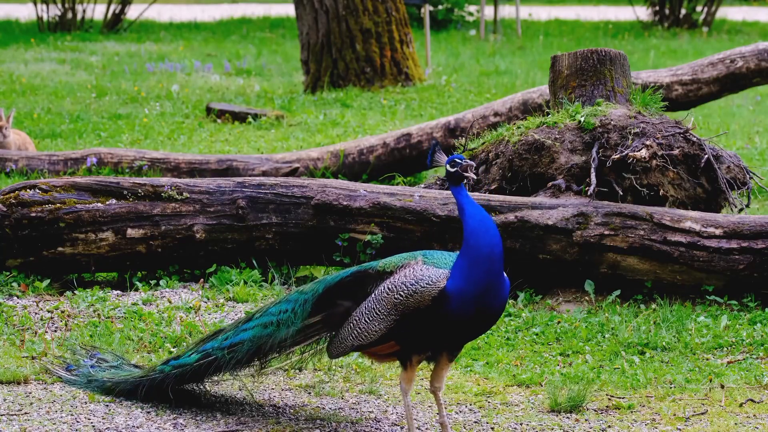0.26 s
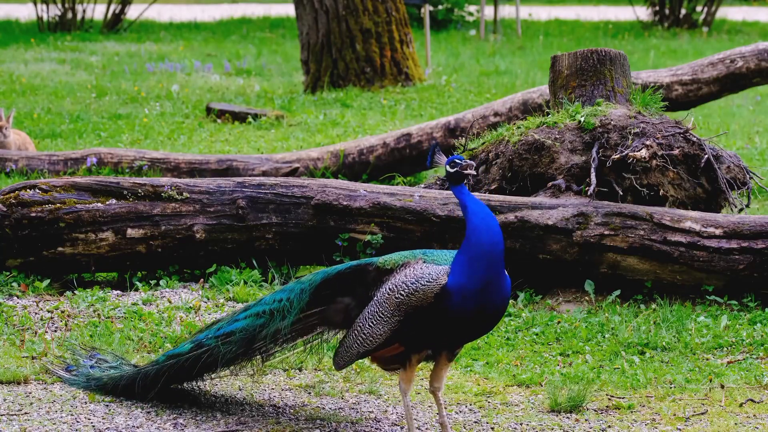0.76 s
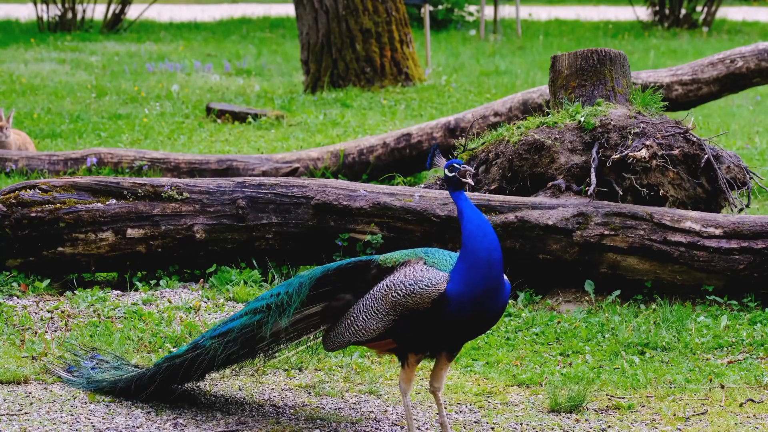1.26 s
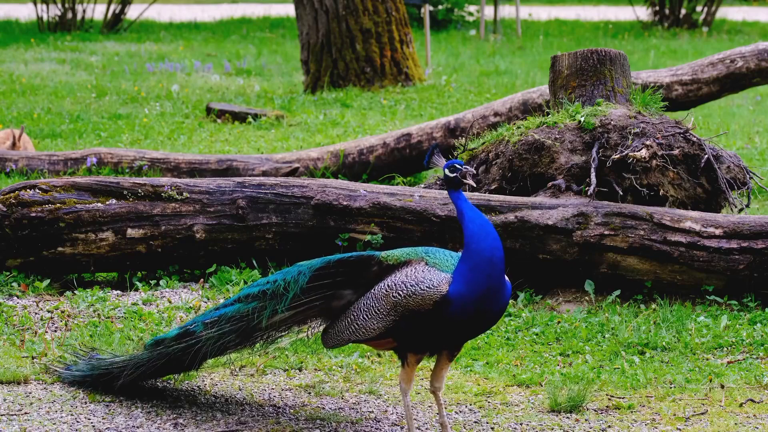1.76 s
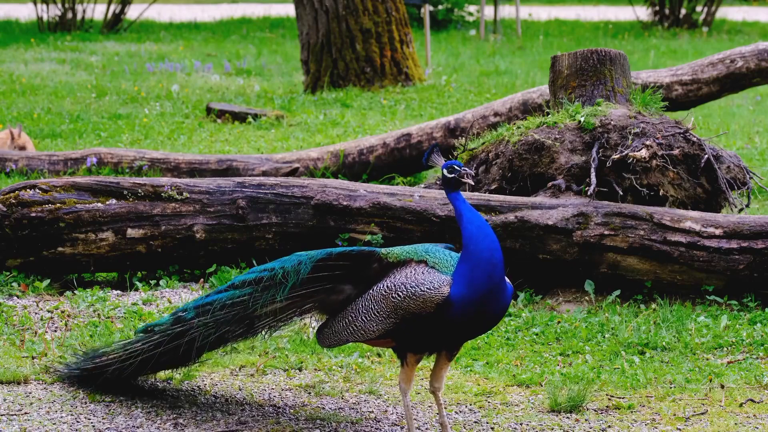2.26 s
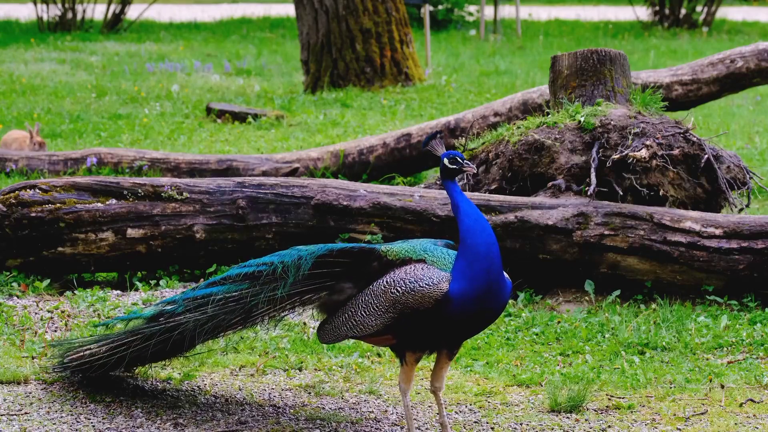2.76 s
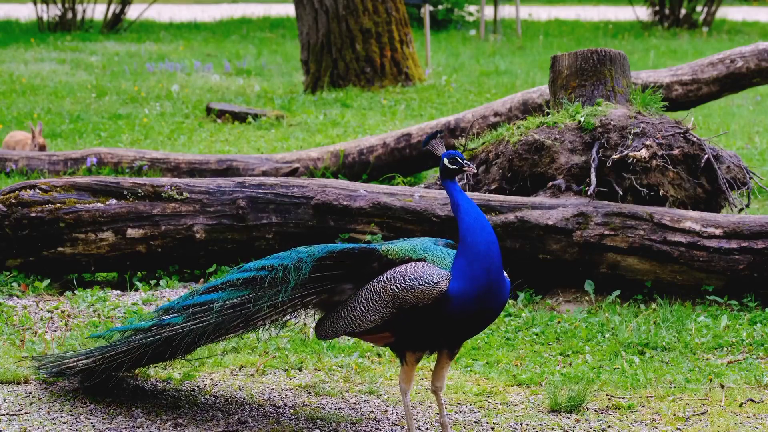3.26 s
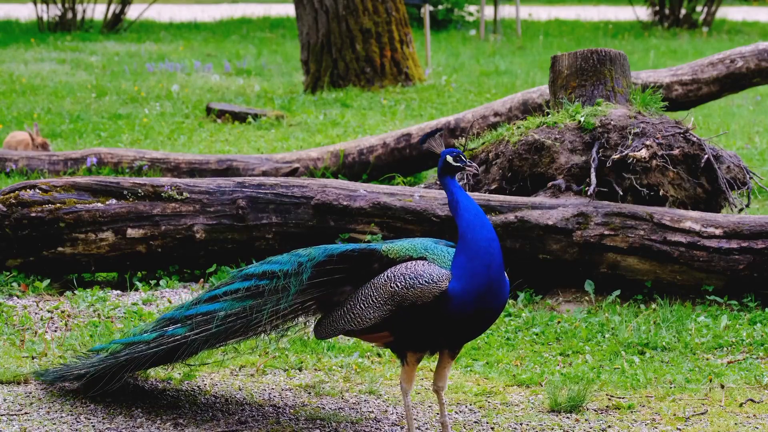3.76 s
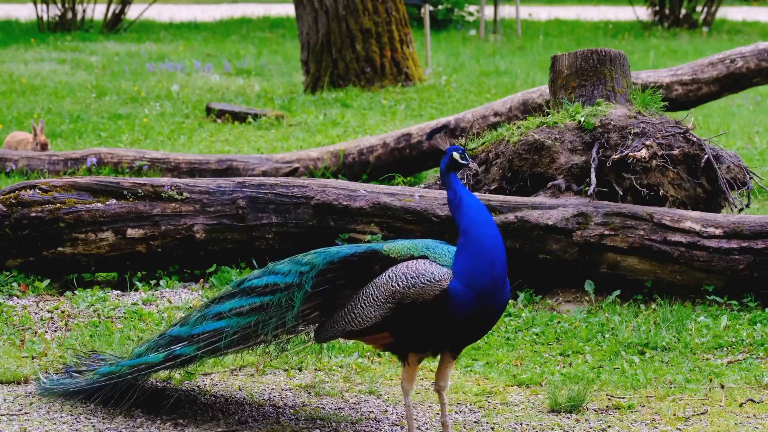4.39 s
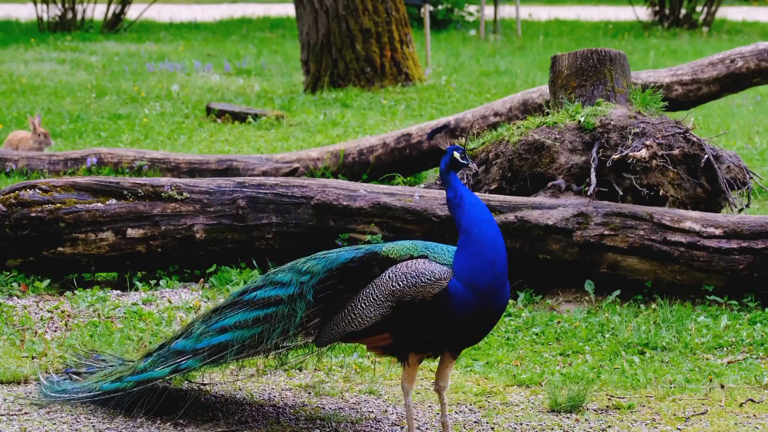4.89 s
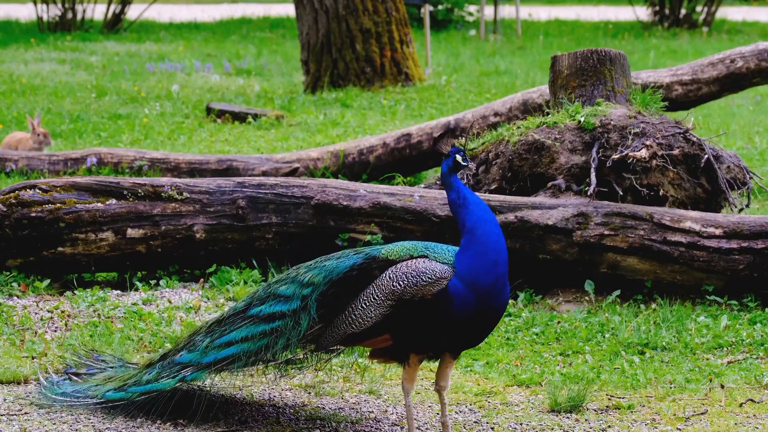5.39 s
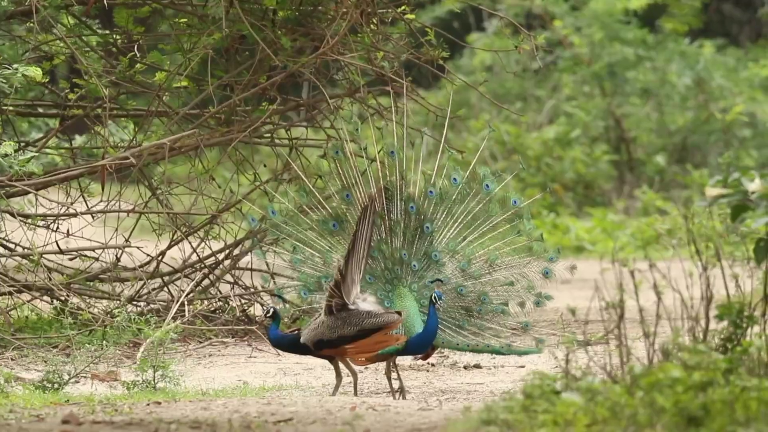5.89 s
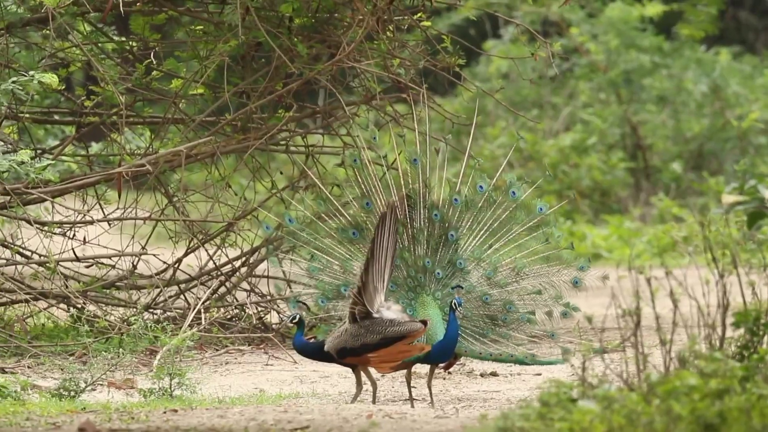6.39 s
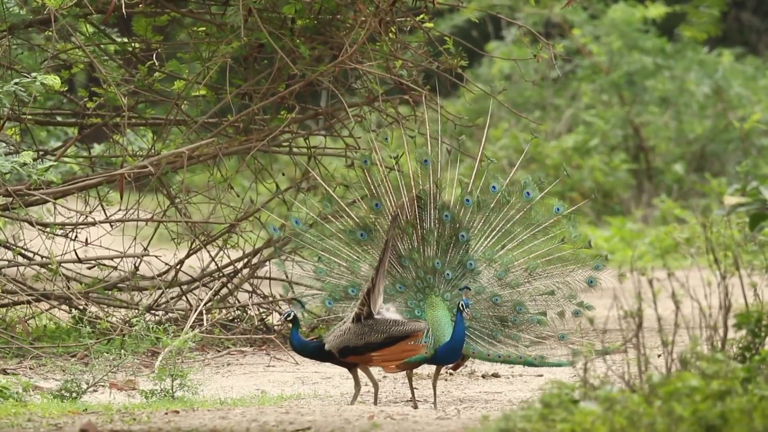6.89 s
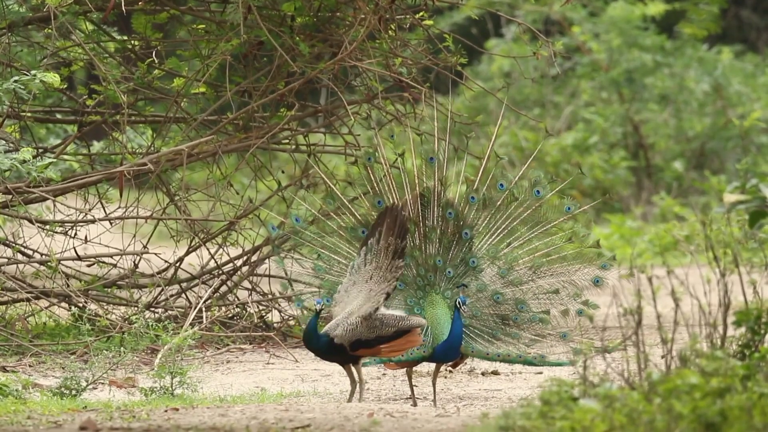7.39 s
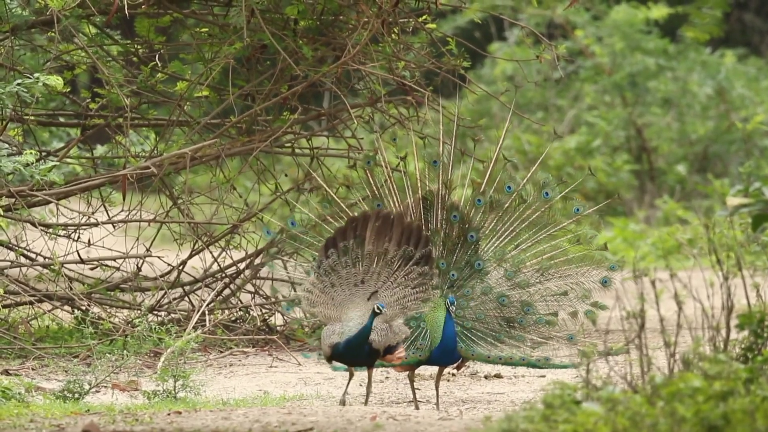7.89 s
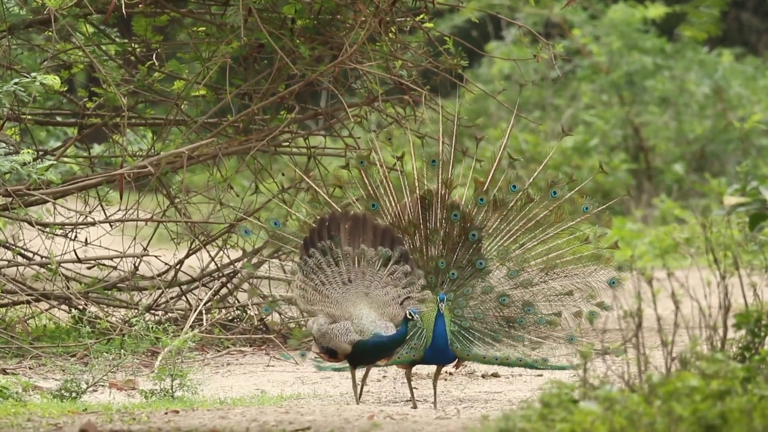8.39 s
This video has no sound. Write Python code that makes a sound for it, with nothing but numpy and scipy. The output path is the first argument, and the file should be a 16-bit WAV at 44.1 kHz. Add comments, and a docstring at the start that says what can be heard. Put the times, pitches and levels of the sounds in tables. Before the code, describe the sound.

Loud, nasal peacock calls echo off trees and stop abruptly; soft birdsong and dull scuffs follow, then rumbling wind, insect hiss and whistling birds.

```python
"""The end of a peacock's cry rings out, then three more full cries: stacks of partials shaped by beak and
windpipe, echoed by trees. A cut drops cries and echo; a songbird repeats its phrase in bending, trilled tones
over noise-made air and dull scuffs close by. A second cut moves to windy scrubland, in mono: low rumble, bands
of insect hiss, whistling birds, grains for rustles and fuzzy distant calls, and fading tones for a twig snap."""
import sys
import numpy as np
from scipy import signal
from scipy.fft import rfft, irfft
from scipy.io import wavfile
from scipy.ndimage import uniform_filter1d

SR = 44100
rng = np.random.default_rng(int(sys.argv[2]) if len(sys.argv) > 2 else 0)


def magnitude_from_level(level_db):
    """Linear magnitude for a level in decibels (20 dB per decade)."""
    exponent = np.asarray(level_db, float) / 20
    return 10 ** exponent


def materialize(psi):
    """Save the field psi as 16-bit PCM at rate SR to the path in sys.argv[1].

    A 1-D psi becomes a single channel; in a 2-D psi each row is a channel.
    """
    bounded = np.clip(np.atleast_2d(psi).T, -1, 1)
    quanta = np.round(bounded * 32767).astype(np.int16)
    wavfile.write(sys.argv[1], SR, quanta)


N = 381465  # samples in the scene
CUT_ECHO_S, CUT_SCRUB_S = 2.62, 5.712  # when cries and echo stop; when the scrub takes over


# the start of every cry: t/s after the start, level/dB (4 dB is added later), f/Hz, brightness/dB
CRY_RISE = [(0, -23, 590.4, -16), (0.013, -18.5, 660.6, -5.5), (.066, -19.5, 717, -3.5),
            (.105, -19.5, 739, 3), (.16, -21.5, 758, 6.5)]
# the end of a cry: t/s left before slowing, level/dB (4 dB is added later), share of the drop to END_HZ,
# brightness/dB
CRY_FALL = [(0.174, -20, 0.019, 5), (.14, -18, 0.0616, 2), (0.089, -19.5, .19, 2.5), (.06, -22, .36, 1.5),
            (.022, -23.5, .6, -6), (0.002, -33.5, 1.09, 6)]


def contour(start, length, top_hz, top_db, slow):
    """A cry's pitch and level over time: a shared rise, a peak, and a fall stretched by its slowness."""
    TOP_AT, END_HZ = 0.47, 590  # share of the cry at which the pitch peaks; where it drops to
    fall = [(length - left * slow, db, top_hz - drop * (top_hz - END_HZ), bright_db)
            for left, db, drop, bright_db in CRY_FALL]
    rows = np.array(CRY_RISE + [(TOP_AT * length, top_db, top_hz, 0)] + fall)
    times = start + np.maximum.accumulate(rows[:, 0])
    return np.column_stack([times, rows[:, 1:]])


# balance of partials 1, 2, 3 .. as the beak opens: level/dB, relative
BEAK_OPENING = [-19, 1, -4.5, -10, -17, -14.5, -16, -31, -22, -29, -34.5, -39, -38, -31, -50, -40, -38, -31,
                -50, -40, -48]
# the same as the beak gapes: level/dB, relative
BEAK_GAPING = [-14, -3, 4.5, -11, -13, -8.5, -15.5, -13, -11, -21, -24.5, -24.5, -23, -38, -33, -32, -27,
               -45, -27, -36, -27]
# the same as the beak shuts: level/dB, relative
BEAK_SHUTTING = [-13.5, 4, 2, -9.5, -20.5, -17, -23, -25, -24.5, -28.5, -31, -32.5, -49, -30, -38, -33, -33,
                 -38, -35, -38, -33]
# time left when the beak starts to open, gapes, and is nearly shut: t/s, stretched in longer cries
BEAK_LEFT = (0.386, 0.344, 0.13)
# windpipe peaks and dips that stay in place: f/Hz, half width/Hz, level/dB (relative)
WINDPIPE_PEAKS = [(1350, 1040, 2), (2680, 103, -9.5), (2892, 180, 12.5), (3054, 34, -12), (3418, 125, 14.5),
                  (3630, 36, -6), (4190, 67, 1.5)]


def cry(rows):
    """An arch of wavering partials, shaped by beak and windpipe, rough and breathy at its start and end."""
    USUAL_S = 0.443  # usual length of a cry
    ROUGH_ENDS, ROUGH_S = 10.3, 0.04  # extra unsteadiness as the voice starts and stops; how fast it dies
    BREATH_DB, BREATH_HZ = -46.5, (1200, 5860)  # air noise against the voice, before the ends boost it
    SPILL_DB_PER_HZ = 0.0496  # the half-shut beak beams less: low ends of a cry reach the trees more
    s, *columns = np.transpose(rows)
    t = np.arange(s[0], s[-1], 1 / SR)
    db, hz, bright_db = (uniform_filter1d(np.interp(t, s, c), size=n, mode="nearest")
                         for c, n in zip(columns, (300, 1000, 1000)))
    scale = max(s[-1] - s[0], USUAL_S) / USUAL_S
    beak = np.interp((t - s[-1]) / scale, -np.array(BEAK_LEFT), [0, 1, 2])
    rough = 1 + ROUGH_ENDS * (np.exp((s[0] - t) / ROUGH_S) + np.exp((t - s[-1]) / ROUGH_S))
    jitter = 0.0076 * rough * uniform_filter1d(rng.standard_normal(len(t)), size=200)
    turns = np.cumsum(hz * (1 + jitter)) / SR
    k = np.arange(1, len(BEAK_GAPING) + 1)[:, None]  # number of each partial
    beak_db = np.array([np.interp(beak, [0, 1, 2], d)
                        for d in zip(BEAK_OPENING, BEAK_GAPING, BEAK_SHUTTING)])
    # partials swell as they cross a windpipe peak, and shift in phase
    pipe_db = sum(d / (1 + 1j * (k * hz - f) / w) for f, w, d in WINDPIPE_PEAKS)
    lag = -np.log(10) / 20 * pipe_db.imag
    brightness = bright_db * np.clip(k - 4, 0, 2) / 2  # half on partial 5, full from 6 up
    levels = magnitude_from_level(beak_db + pipe_db.real + brightness)
    levels /= np.sqrt((levels ** 2).sum(0) / 2)
    # high partials waver most, slowly and then as a rasp
    slow = evened(uniform_filter1d(rng.standard_normal(levels.shape), size=1000))
    fast = evened(uniform_filter1d(rng.standard_normal(levels.shape), size=90))
    waver = magnitude_from_level((0.46 + 0.29 * np.minimum(k, 9)) * slow)
    waver *= magnitude_from_level(0.017 * k * np.sqrt(rough) * fast)
    phase = 2 * np.pi * k * turns + 1.6 + 1.34 * k - lag
    voice = (levels * waver * np.cos(phase)).sum(0)
    band = signal.butter(1, BREATH_HZ, "bandpass", fs=SR, output="sos")
    breath = evened(signal.sosfilt(band, rng.standard_normal(len(t))))
    voice += magnitude_from_level(BREATH_DB) * rough * breath
    edge = np.minimum(np.minimum(t - s[0], s[-1] - t) / 0.007, 1)
    spill = magnitude_from_level(SPILL_DB_PER_HZ * (hz.max() - hz))
    to_listener_and_trees = np.array([np.ones_like(spill), spill])
    return magnitude_from_level(db + 4) * voice * edge * to_listener_and_trees


# the cries: t/s, length/s, top f/Hz, level/dB at the top (4 dB is added later), slowness of the fall
PEACOCK_CRIES = [ (-.37, .459, 760, -23, 1.2), (0.289, 0.47, 758, -21, 1.16), (0.967, 0.5, 762, -21, 1.2),
                 (1.754, 0.56, 776, -24.5, 1.65)]
# loudness balance of the direct cry: f/Hz, left minus right level/dB
CRY_SIDE_BALANCE = [(300, 0.5), (1400, -2), (2400, -2), (4400, 1.5), (15000, -2.5)]
# phase of the direct cry between the ears: f/Hz, lead of the left/radians
CRY_LEFT_LEAD = [(1100, -0.14), (1640, 0.99), (2300, -1.12), (2800, 0.23), (3450, 0.39), (3800, -1.23),
                 (6500, 0.7)]


def peacock():
    """Cries whose middle tones lean right, with a long tree echo and a quick one from close trunks."""
    both = np.zeros((2, SR + N))  # one second of lead-in, as the first cry began earlier
    for row in PEACOCK_CRIES:
        add(both, 1 + row[0], cry(contour(*row)))
    dry, scattered = both
    far_echo = magnitude_from_level(-20.5) * echo(scattered, 1.0, 0.033)
    trunk_echo = magnitude_from_level(-23) * echo(scattered, 4.9, 0.012)
    wet = (far_echo + trunk_echo)[:, SR:]
    spectrum, hz = rfft(dry[SR:]), np.fft.rfftfreq(N, 1 / SR)
    phase = np.exp(0.5j * np.array([[1], [-1]]) * read(CRY_LEFT_LEAD, hz))
    direct = irfft(spectrum * sides(read(CRY_SIDE_BALANCE, hz)) * phase, N)
    return (direct + wet) * (np.arange(N) < CUT_ECHO_S * SR)


# how long echoes ring: f/Hz, time to fall 60 dB/s (divided by the echo's speed)
TREE_RING = [(300, 1.7), (800, 2.2), (2000, 1.34), (4000, 1.25), (8000, 0.91), (15000, 0.48)]
# colour of the echo at its start: f/Hz, level/dB (relative)
LEAF_COLOUR = [(700, 3), (1200, -7.5), (1500, -11), (2000, 1), (2900, -2), (5000, 0.5)]


def echo(x, speed, gap_s):
    """Scattered echoes from trunks and leaves: sparse taps that die band by band."""
    taps = np.zeros((2, 2 * SR))
    at = np.arange(round(gap_s * SR), 2 * SR - 20, 20)
    at = at + rng.integers(0, 20, (2, len(at)))
    np.put_along_axis(taps, at, rng.choice([-1., 1.], at.shape), 1)
    hz, t, z = signal.stft(taps, SR, nperseg=256)
    fading_db = read(LEAF_COLOUR, hz)[:, None] - 60 * speed * t / read(TREE_RING, hz)[:, None]
    tail = signal.istft(alike(z) * magnitude_from_level(fading_db), SR, nperseg=256)[1]
    return signal.fftconvolve(x[None], tail / np.linalg.norm(tail[0]), axes=1)[:, :len(x)]


# the songbird's phrases: t/s, level/dB (added to each note's)
BIRD_PHRASES = [(3.998, -49), (4.431, -49.5), (4.877, -51.5), (5.315, -50.5)]
# notes of a phrase, the last one trilled: t/s after its start, length/s, held f/Hz,
# f above that at the onset/Hz, level/dB (added to the phrase's)
PHRASE_NOTES = [(0, 0.012, 3370, -300, -6), (.017, 0.019, 4000, -120, 1.5), (.034, 0.0665, 3960, 440, 7),
                (.176, 0.099, 4085, 334, 5)]


def songbird():
    """A phrase sung a little to the right; pitches swoop to their held value and each note fades."""
    song = np.zeros((2, N))
    for start, phrase_db in BIRD_PHRASES:
        for k, (s, length, hz, above_hz, db) in enumerate(PHRASE_NOTES):
            pitch = hz + above_hz * np.exp(-np.arange(0, length, 1 / SR) / 0.0057)
            trill = 0.56 * (k == len(PHRASE_NOTES) - 1)
            note = tone(pitch, db + phrase_db, trill, soft=0.28, wobble=0.09)
            note = note * magnitude_from_level(-60 * np.arange(len(note)) / SR)  # loses 60 dB a second
            add(song, start + s, note * sides(-1.1))
    return song


# stray gliding whistles: t/s, length/s, first f/Hz, last f/Hz, level/dB
PARK_SLIDES = [(2.511, 0.019, 3780, 4730, -58.5), (2.535, 0.019, 4000, 3240, -59),
               (2.57, .016, 5200, 3900, -63), (2.64, 0.058, 1985, 3130, -63),
               (2.688, 0.0128, 3140, 2100, -60), (2.744, 0.0113, 3330, 4730, -60),
               (2.752, 0.0235, 3630, 4250, -54), (2.824, 0.018, 3300, 3450, -55),
               (3.589, 0.066, 3530, 3500, -58), (3.764, 0.0061, 4860, 4440, -52),
               (3.771, 0.037, 4580, 4550, -47.5), (5.218, 0.036, 3450, 3130, -65)]
# trilled bending whistles: t/s, length/s, first f/Hz, middle f/Hz, last f/Hz, level/dB
PARK_BENDS = [(2.96, 0.091, 1800, 3850, 2300, -59), (2.832, .06, 3400, 2450, 2150, -58)]


def park_birds():
    """The songbird and stray whistles from the right, with an echo among the trees."""
    birds = songbird()
    for s, *note in PARK_SLIDES:
        add(birds, s, glide(*note) * sides(-7.5))
    for s, *note in PARK_BENDS:
        add(birds, s, whistle(*note, trill=0.74) * sides(-11.0))
    # moving leaves blur the echo
    stir = 1 + 0.37 * evened(uniform_filter1d(rng.standard_normal(N), size=250))
    return birds + magnitude_from_level(-6.5) * stir * echo(birds.mean(0), 1.9, 0.0089)


# dull scuffs, some stuttering: t/s, peak level/dB, centre f/Hz, count
SCUFF_HITS = [(3.3, -34, 560, 3), (3.356, -37, 590, 1), (3.641, -34, 575, 1), (3.676, -40.5, 624, 1),
              (3.777, -31.5, 590, 2), (3.823, -29.5, 557, 1), (3.87, -33, 1320, 1), (3.902, -35.5, 700, 2),
              (4.343, -39, 1350, 1), (5.46, -34, 590, 5), (5.54, -38, 479, 1), (5.589, -33.5, 370, 1)]


def scuffs():
    """Each scuff is a few uneven ticks into a dull, short resonance and a broad thud."""
    GAP_S, SPREAD = 0.014, 0.2  # gap between repeats; scatter of their pitch
    out, muffle = np.zeros((2, N)), signal.butter(4, 1900, fs=SR, output="sos")
    t = np.arange(1500) / SR
    for s, db, centre_hz, count in SCUFF_HITS:
        for k in range(round(count)):
            hz = centre_hz * np.exp(SPREAD * rng.standard_normal() * (count > 1.5))
            ticks = rng.standard_normal(1500) ** 3 * np.exp(-t / 0.0061) * np.minimum(t / 0.0011, 1)
            dull = evened(ring(ring(ticks, hz, 360), hz, 360))
            thud = evened(ring(ring(ticks, 990, 920), 990, 920))
            sound = signal.sosfilt(muffle, dull + 0.73 * thud)
            sound = magnitude_from_level(db) * sound / abs(sound).max()
            add(out, s + k * GAP_S, sound * sides(-hz / 130))  # higher ones lean further right
    return out


# faint buzzes and a low bump: t/s, length/s, f/Hz, width of each resonance/Hz, level/dB
PARK_BUZZES = [(3.41, 0.3, 8100, 500, -75), (4.1, 0.22, 7800, 500, -72.5), (4.08, 0.13, 170, 69, -52)]


def buzzes():
    """Faint buzzes and a low bump in the middle, made of grains through narrow resonances."""
    out = np.zeros(N)
    for s, *shape in PARK_BUZZES:
        add(out, s, rustle(*shape))
    return out


# colour of the park's air: f/Hz, level/dB per Hz (relative)
PARK_AIR_COLOUR = [(20, -44), (70, -17.5), (200, -15), (340, -2), (600, -6.5), (1170, -10), (2000, -18.5),
                   (2630, -21.5), (7500, -33), (10100, -40), (12500, -47), (15500, -71)]
# loudness of the park's air before the gain control: t/s, level/dB
PARK_AIR_LEVEL = [(0, -53), (2.6, -53), (5.7, -52)]


def park_air():
    """Quiet, patchy, flickering stereo noise with most of its strength in the low tones."""
    t = np.arange(N) / SR
    return magnitude_from_level(np.interp(t, *np.transpose(PARK_AIR_LEVEL))) * hiss(PARK_AIR_COLOUR, 1.45, 1.0)


def levelled(x):
    """Automatic gain control: turns the whole park down when it is loud and lets it back up afterwards."""
    power_db = 10 * np.log10(abs(uniform_filter1d((x ** 2).mean(0), size=400)) + 1e-12)
    fall = np.arange(N) * 140.0 / SR  # the sensed level falls at most 140 dB a second
    held_db = np.maximum.accumulate(power_db + fall) - fall
    over_db = np.maximum(held_db + 43.0, 0)  # acts above -43 dB
    return x / magnitude_from_level(0.24 * uniform_filter1d(over_db, size=200))


# arched whistles, mostly of a near bird, the last a longer, higher one: t/s, length/s, top f/Hz, level/dB, #
# scoop time/s, share of pitch lost at the end
ARCHED_WHISTLES = [(5.715, 0.03, 2230, -45.5, 0.0038, 0.13), (5.813, 0.1, 2263, -33.5, 0.0088, 0.13),
                   (6.025, 0.048, 2540, -32, 0.012, 0.14), (6.062, 0.053, 2313, -32.5, 0.0016, 0.175),
                   (6.235, 0.088, 2510, -28, 0.013, 0.22), (6.482, 0.079, 2386, -34.5, .008, 0.098),
                   (6.913, 0.059, 2415, -45.5, 0.0197, .1), (7.125, 0.037, 2300, -44.5, 0.0076, 0.08),
                   (7.308, .045, 2300, -47.5, .015, .14), (8.015, 0.055, 3200, -42.5, 0.016, .3)]
# high gliding whistles: t/s, length/s, first f/Hz, last f/Hz, level/dB
SCRUB_SLIDES = [(6.616, .013, 7300, 4840, -57), (6.826, .022, 7070, 4600, -50),
                (7.599, 0.045, 6900, 6400, -39.5), (7.628, 0.045, 6200, 5000, -42),
                (8.412, 0.042, 3840, 3780, -50)]
# an insect's ticks: t/s
INSECT_TICKS = [6.675, 6.7, 6.74, 6.77, 6.886, 6.916, 6.965, 6.998, 7.012, 7.092, 7.114, 7.165, 7.388,
                7.882, 8.215]
# shape of one tick: length/s, first f/Hz, middle f/Hz, last f/Hz
TICK_SHAPE = (0.008, 3550, 3800, 4000)


def near_callers():
    """Whistling birds and a ticking insect, all near-sine tones, with a short echo."""
    out = np.zeros(N)
    for s, *note in ARCHED_WHISTLES:
        add(out, s, arched(*note))
    for s, *note in SCRUB_SLIDES:
        add(out, s, glide(*note))
    for s in INSECT_TICKS:
        add(out, s, whistle(*TICK_SHAPE, db=-49.0))
    return out + magnitude_from_level(-13) * echo(out, 2.5, 0.03)[0]


# a far bird's runs of pointed arches: t/s, level/dB of the first arch, count, top f/Hz before smoothing
FAR_RUNS = [(6.988, -54, 1, 2800), (7.099, -51, 2, 2650), (7.261, -50.5, 2, 2700), (7.432, -46.5, 2, 2930),
            (7.607, -44, 2, 2920), (7.767, -43.5, 2, 2900), (7.936, -44, 2, 2850), (8.109, -43.5, 2, 2880),
            (8.27, -44, 2, 2970), (8.453, -44.5, 2, 2950), (8.623, -43, 1, 2950)]


def far_bird():
    """Tones whose pitch rises to a point and falls, blurred by echo from the bushes."""
    LENGTH_S, GAP_S, STEP_DB = 0.0284, 0.04, -4  # one arch; spacing and level step within a run
    far = np.zeros(N)
    u = np.arange(0, 1, 1 / LENGTH_S / SR)
    for s, db, count, top_hz in FAR_RUNS:
        for k in range(round(count)):
            # start, point and end as shares of the top pitch, each slightly off
            shares = [0.74, 1, 0.8] * (1 + 0.025 * rng.standard_normal(3))
            pitch = uniform_filter1d(np.interp(u, [0, 0.5, 1], shares), size=250, mode="nearest")
            add(far, s + k * GAP_S, tone(top_hz * pitch, db + k * STEP_DB))
    return far + magnitude_from_level(-3) * echo(far, 6, 0.004)[0]


# tones of a snapping twig: f/Hz, level/dB at the start, time to fall 60 dB/s
TWIG_TONES = [(1300, -19, 0.0076), (2670, -11, 0.0064), (4160, -8.5, 0.0028)]


def twig_snap():
    """Short tones that die at once, then a weaker bounce off the ground."""
    SNAP_S = 6.1424
    out, t = np.zeros(N), np.arange(1500) / SR
    snap = sum(magnitude_from_level(db - 60 * t / t60) * np.sin(2 * np.pi * hz * t) for hz, db, t60 in TWIG_TONES)
    snap *= np.minimum(t / 0.00033, 1)
    add(out, SNAP_S, snap)
    add(out, SNAP_S + 0.003, 0.28 * snap)
    return out


# rustles of feathers or leaves, and two fuzzy distant calls near 1.5 kHz:
# t/s, length/s, f/Hz, width of each resonance/Hz, level/dB
RUSTLES_AND_CALLS = [(6.287, 0.26, 2680, 600, -38.5), (6.303, 0.25, 3700, 1300, -40.5),
                     (6.552, 0.16, 5900, 1300, -45), (6.817, 0.15, 5940, 1200, -44),
                     (7.637, 0.15, 5900, 1300, -40.5), (8.324, 0.16, 6100, 1500, -43.5),
                     (7.999, 0.33, 1570, 600, -44.5), (8.479, 0.16, 1520, 600, -44.5)]
# a hoarse bird note: t/s, length/s, f/Hz, width of each resonance/Hz, level/dB
HOARSE_NOTE = [(8.3, .13, 2170, 200, -41.5)]


def rustles_and_fuzzy_calls():
    """Rustles, two fuzzy distant calls and a hoarse bird note, all made of grains through resonances."""
    out = np.zeros(N)
    for s, *shape in RUSTLES_AND_CALLS + HOARSE_NOTE:
        add(out, s, rustle(*shape))
    return out


# colour of the wind: f/Hz, level/dB per Hz (relative)
WIND_COLOUR = [(12, -49), (20, -51), (70, 2), (107, -9.5), (182, 4.5), (252, -9), (374, -8.5), (460, -25),
               (510, -12.5), (594, -29), (1200, -31.5), (1800, -70)]
# loudness of the wind: t/s, level/dB
WIND_GUSTS = [(5.72, -32.5), (6.5, -31), (7.2, -28.5), (7.7, -30), (8.65, -29)]


def wind():
    """Low noise that rumbles louder and softer in gusts."""
    t = np.arange(N) / SR
    return magnitude_from_level(np.interp(t, *np.transpose(WIND_GUSTS))) * hiss(WIND_COLOUR, 0.62, 0.58)[0]


# colour of the scrub's air, with insect bands: f/Hz, level/dB per Hz (relative)
INSECT_COLOUR = [(290, -49), (500, -0.5), (1070, -3.5), (1850, -8.5), (2290, -12), (3430, -15),
                 (3740, -12.5), (4640, -21.5), (5510, -3), (6650, -11.5), (7460, -2), (8130, -15),
                 (9940, -10), (11200, -28.5), (15500, -37.5)]


def insect_hiss():
    """Patchy noise with the insects' bands standing out."""
    return magnitude_from_level(-40.5) * hiss(INSECT_COLOUR, 1.1, 0.4)[0]


def hiss(spectrum, patchy_db, flicker_db):
    """Two channels of noise of rms 1 with drifting patches and a shared flicker."""
    frames, hz = N // 256 + 5, np.fft.rfftfreq(1024, 1 / SR)
    a, b, c, d, patches = rng.standard_normal((frames, 513, 5)).T
    patches = evened(uniform_filter1d(uniform_filter1d(patches, 10, 0), 12, 1))
    flicker = evened(uniform_filter1d(rng.standard_normal(frames), 6))
    z = alike(np.array([a + 1j * b, c + 1j * d]))
    z *= magnitude_from_level(read(spectrum, hz)[:, None] + patchy_db * patches + flicker_db * flicker)
    return evened(signal.istft(z, nperseg=1024, noverlap=768)[1][:, :N])


# likeness of left and right in air and echo: f/Hz, likeness (1 = the same)
SIDE_LIKENESS = [(60, 1.0), (240, 1), (950, 0.9), (3770, 0.014), (15000, 1)]


def alike(z):
    """Mixes two unrelated short-time spectra to the left-right likeness of the park."""
    hz = np.linspace(0, SR / 2, z.shape[1])
    same = np.where(hz < 250, 1, np.clip(read(SIDE_LIKENESS, hz), -1, 1))[:, None]  # bass is mono
    return np.array([z[0], same * z[0] + np.sqrt(1 - same ** 2) * z[1]])


def tone(hz, db, trill=0, soft=0.18, wobble=0.14):
    """A near-sine note on a slightly unsteady pitch curve; a trill throbs its level."""
    TRILL_HZ = 256.6  # average rate
    drift = wobble * uniform_filter1d(rng.standard_normal((2, len(hz))), size=250)
    angle = 2 * np.pi * np.cumsum(hz * (1 + drift[0])) / SR
    trill_turns = TRILL_HZ * np.cumsum(1 + 12 * drift[1]) / SR
    throb = evened(np.exp(trill * np.cos(2 * np.pi * trill_turns)))
    edges = signal.windows.tukey(len(hz), np.clip(soft, 0, 1))
    return magnitude_from_level(db) * np.sqrt(2) * np.sin(angle) * throb * edges


def whistle(length, first_hz, middle_hz, last_hz, db, trill=0):
    """A note whose pitch bends through three points."""
    u = np.linspace(0, 1, round(length * SR))
    bend = np.polyfit([0, 0.5, 1], [first_hz, middle_hz, last_hz], 2)
    return tone(np.polyval(bend, u), db, trill)


def glide(length, first_hz, last_hz, db):
    """A note that slides evenly."""
    return tone(np.linspace(first_hz, last_hz, round(length * SR)), db)


def arched(length, top_hz, db, scoop_s, droop):
    """A note scooped up to its pitch that droops late, towards the end."""
    t = np.arange(0, length, 1 / SR)
    scoop = 0.241 * np.exp(-t / scoop_s)  # share of the pitch still missing
    return tone(top_hz * (1 - scoop - droop * (t / length) ** 2.99), db, soft=0.66)


def rustle(length, hz, width, db):
    """Grains through a double resonance; they swell fast and thin out slowly."""
    grains = rng.standard_normal(16000)[:round(length * SR)] ** 3
    u = np.linspace(0, 1, len(grains))
    swell = np.sin(np.pi * u ** 0.57) ** 2
    return magnitude_from_level(db) * evened(ring(ring(grains, hz, width), hz, width)) * swell


def ring(x, hz, width):
    """One resonance of gain 1."""
    pole = np.exp((2j * np.pi * hz - np.pi * width) / SR)
    return 2 * signal.lfilter([1 - abs(pole)], [1, -pole], x).real


def evened(x):
    """Scales a sound to an rms of 1."""
    return x / np.sqrt(np.mean(x ** 2) + 1e-20)


def read(points, hz):
    """Reads a table's curve at any frequency, along a logarithmic scale."""
    f, value = np.transpose(points)
    return np.interp(np.log(hz + 1), np.log(f + 1), value)


def sides(pan_db):
    """Gains for left and right that differ by pan_db; negative leans right."""
    return magnitude_from_level(np.array([[0.5], [-0.5]]) * pan_db)


def add(mix, s, sound):
    """Adds a sound to the mix from second s on."""
    part = mix[..., round(s * SR):][..., :sound.shape[-1]]
    part += sound[..., :part.shape[-1]]


def scene():
    """Park, then scrub, joined by a cut with brief fades."""
    park = levelled(peacock() + park_birds() + scuffs() + buzzes() + park_air())
    callers = near_callers() + far_bird()
    scrub = callers + twig_snap() + rustles_and_fuzzy_calls() + wind() + insect_hiss()
    fade = (np.arange(N) / SR - CUT_SCRUB_S) / 0.008  # 8 ms out, then 8 ms in
    return park * np.clip(-fade, 0, 1) + scrub * np.clip(fade, 0, 1)


def top_cut(x):
    """Nothing passes above the cut-off."""
    return signal.sosfilt(signal.butter(12, 15670, fs=SR, output="sos"), x)


def record(dry):
    """The finished mix as it reaches the listener."""
    return top_cut(dry)


dry = scene()
out = record(dry)
materialize(out)
```